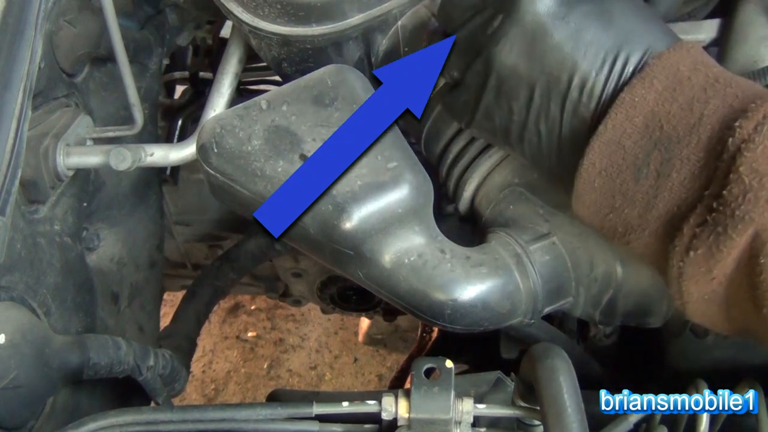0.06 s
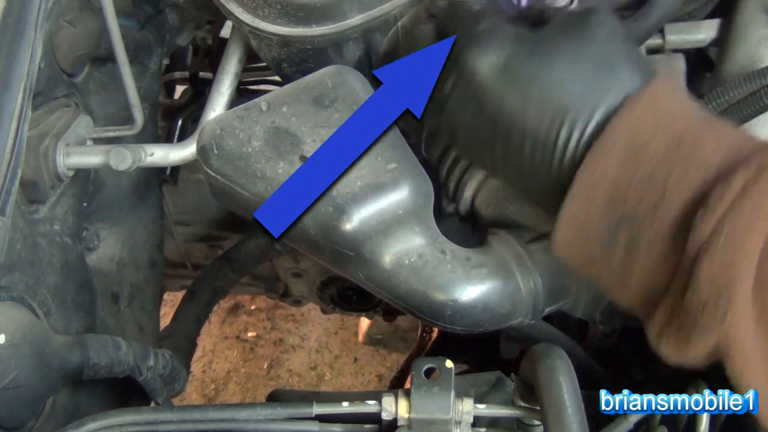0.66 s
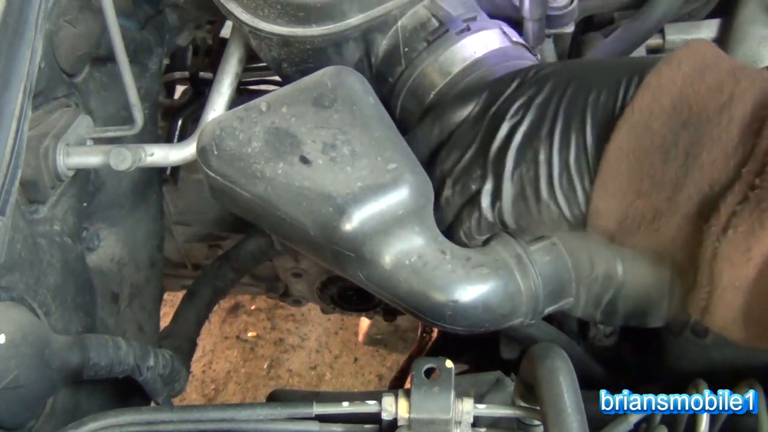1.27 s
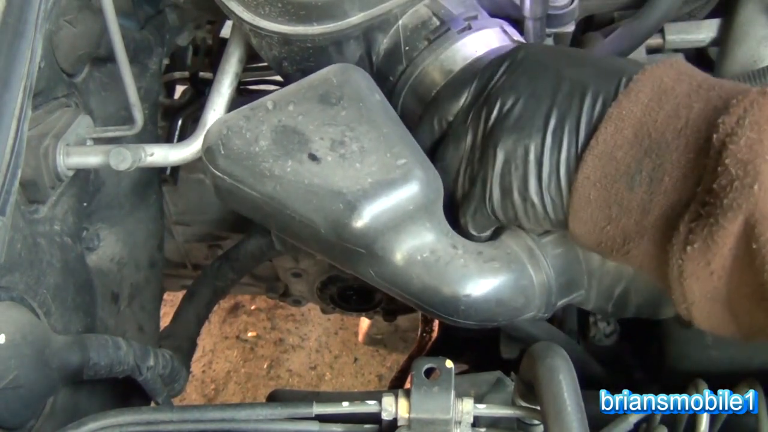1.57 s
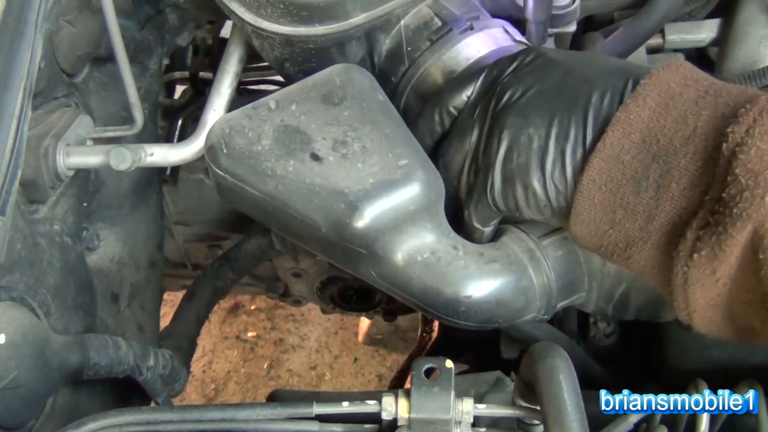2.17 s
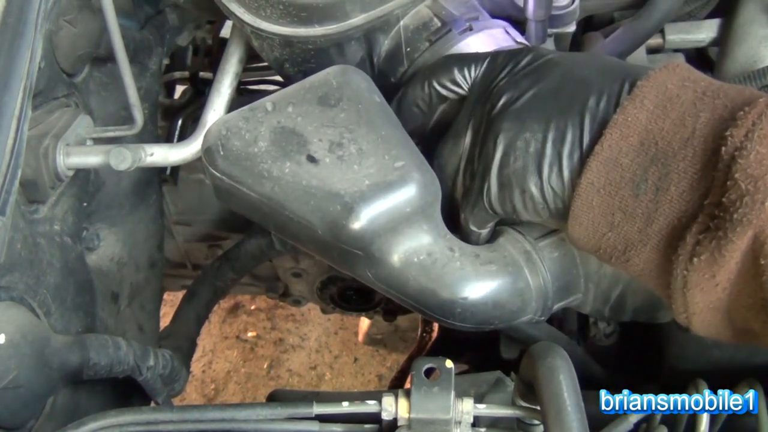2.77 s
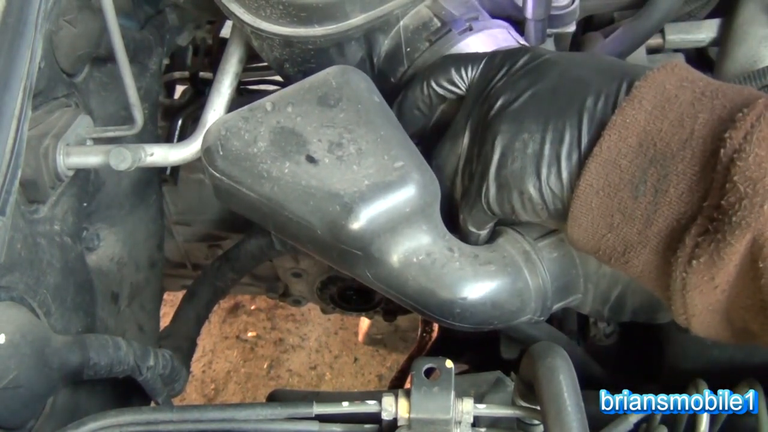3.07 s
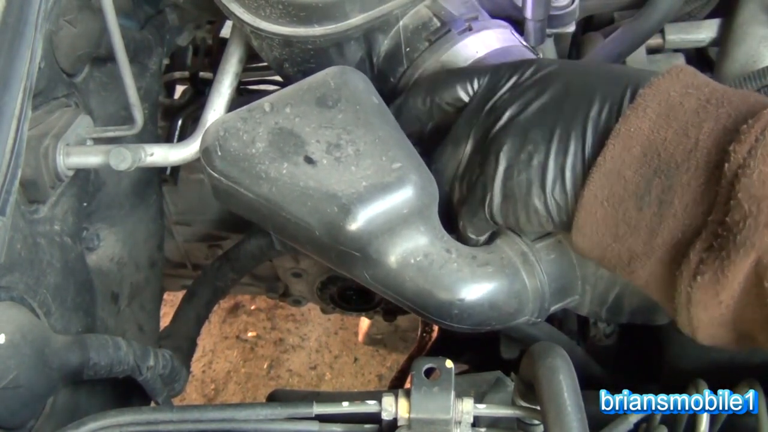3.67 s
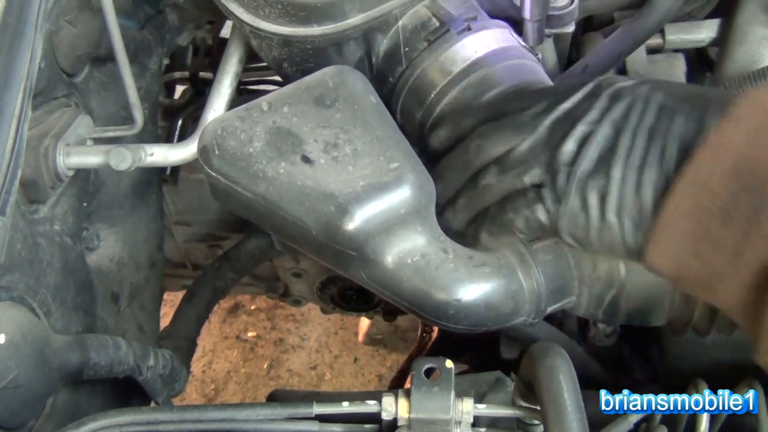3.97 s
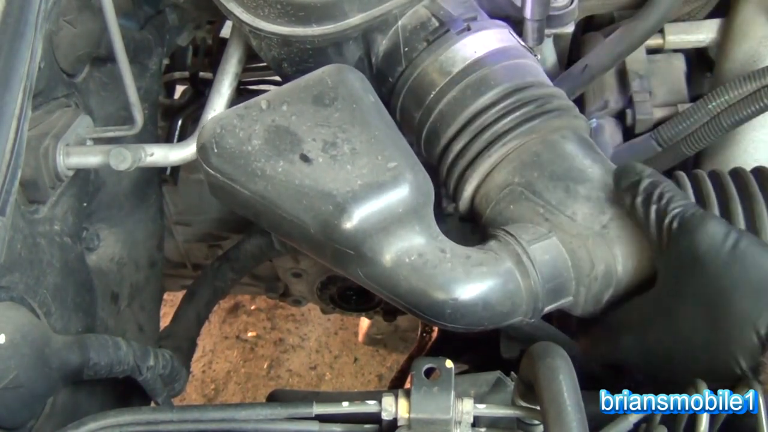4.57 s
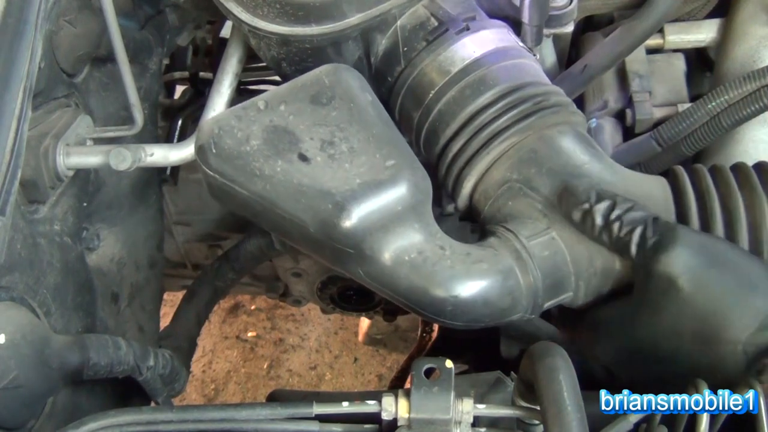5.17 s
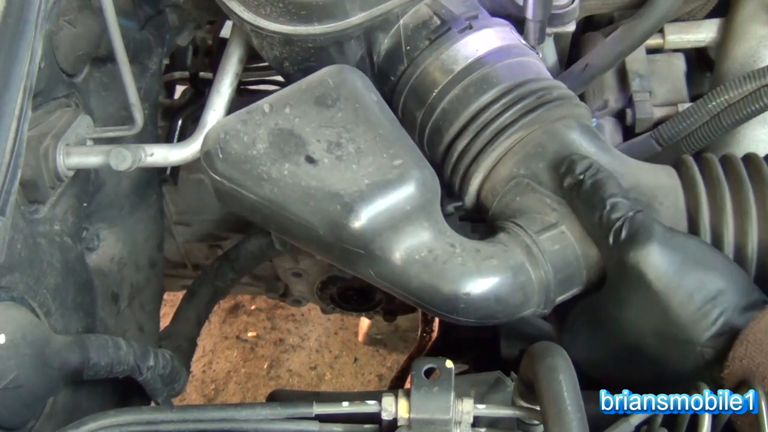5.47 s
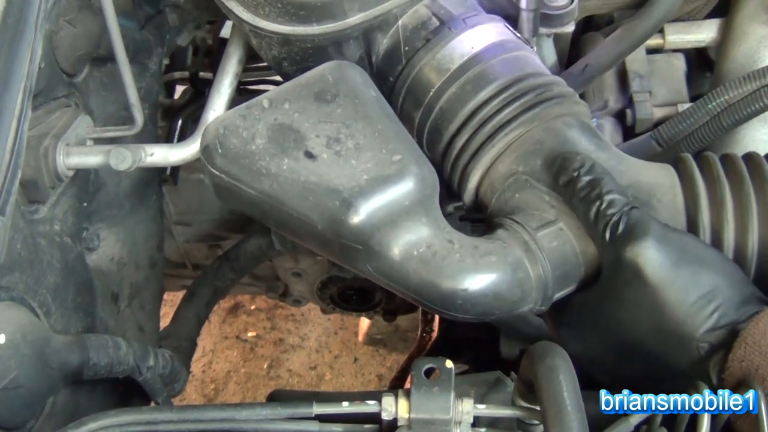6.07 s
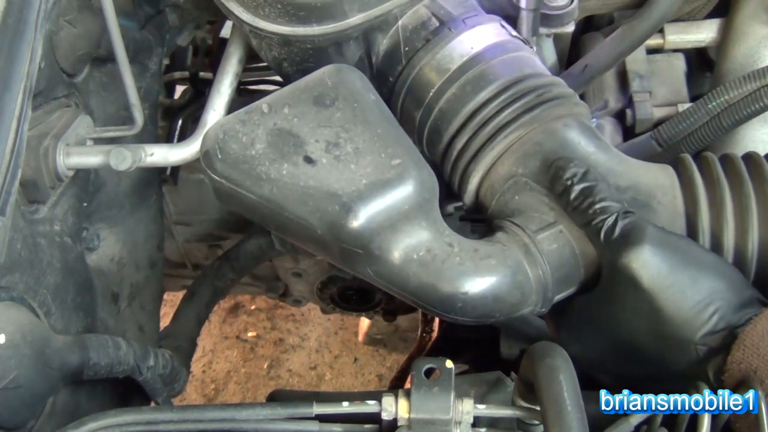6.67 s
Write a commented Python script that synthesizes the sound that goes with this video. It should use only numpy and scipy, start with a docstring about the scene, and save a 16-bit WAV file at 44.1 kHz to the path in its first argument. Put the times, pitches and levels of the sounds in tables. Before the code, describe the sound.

A cordless driver rasps in three short bursts on a hose clamp, while a gloved hand scuffs rubber and knocks a plastic duct.

```python
"""A cordless driver turns a hose clamp in three rasping bursts, close by in a workshop.
Its gears tick once a motor turn; its speed control whines at a fixed pitch.
Between bursts a gloved hand fits a plastic intake duct and its rubber boot on an engine:
the glove scuffs the rubber, the duct clicks and knocks hollowly as it is pushed into line."""
import sys
import numpy as np
from scipy import signal
from scipy.fft import rfft, irfft, next_fast_len
from scipy.io import wavfile
from scipy.ndimage import uniform_filter1d

SR = 44100
rng = np.random.default_rng(int(sys.argv[2]) if len(sys.argv) > 2 else 0)


def transcribe(u):
    """Save the signal u as a 16-bit wav file named by the first command-line argument.

    u: samples, shape (n,) or (channels, n), limited to [-1, 1]; the rate is SR.
    q: integer samples, one column per channel.
    """
    v = np.clip(np.atleast_2d(u).T, -1, 1)
    q = np.round(v * 32767).astype(np.int16)
    wavfile.write(sys.argv[1], SR, q)


N = 305613
T = np.arange(N) / SR
GEAR_RATIO = 52  # motor turns per screw turn
KNEE_HZ = 208  # motor speed above which the rasp levels off

# plastic click spectrum: (frequency [Hz], density [dB])
CLICK_SPECTRUM = [(150, -19.5), (400, -13.5), (900, -8), (1500, -6.5), (2400, 2), (4000, -1.5), (5500, -2),
                  (7600, 8), (9500, -6), (13000, -19), (16000, -34)]
# colour of the stereo width, shared by room tail and air: (frequency [Hz], level [dB])
WIDTH_SPECTRUM = [(450, 3.5), (1100, -11), (7500, 1), (10500, -4)]


def driver(waver=0.0055):
    """Cordless driver: motor speed sets gear rasp and hum; the switched supply whines."""
    hz, rasp_gain, whine_gain, ease = motor()
    turns = np.cumsum(hz * (1 + waver * walk(90))) / SR
    gears = (gear_rasp(turns, hz) + motor_hum(turns, hz, ease)) * rasp_gain
    return pan(gears + brief_tones(), -0.11) + pan(wind_down(turns), -5.5) + supply_whine() * whine_gain


def motor(coast_s=.47, unload_db=-13, unload_s=0.012, fade_db_per_s=65, full_accel_hz_per_s=2500):
    """Speed, rasp gain, whine gain, ease: the screw binds once a turn; let go, the motor coasts."""
    # motor speed, one curve per run: (time [s], speed [Hz])
    speeds = [
        [(.59, 22), (.665, 97.96), (.78, 165.3), (.85, 166.9), (.92, 151.2), (1.0, 101.9), (1.07, 141.1),
         (1.125, 104), (1.165, 61.92)],
        [(2.29, 26.7), (2.35, 73.06), (2.43, 70.7), (2.54, 111.4), (2.67, 79.81), (2.81, 138.1), (2.88, 301.7),
         (3.05, 328.1), (3.3, 313), (3.40, 255.4), (3.46, 155.3)],
        [(6.365, 35.1), (6.42, 112.9), (6.5, 307.3), (6.58, 460.8), (6.71, 540), (6.87, 593)],
    ]
    # trigger pulls: (on [s], off [s], rasp [dB], whine [dB], whine swell [s],
    # speed swing from binding [0-1], easiest turning [s])
    runs = [(.592, 1.16, -18, -33.5, 0.24, 0.02, .86), (2.294, 3.465, -17, -37, 0.0023, 0.03, 3.05),
            (6.366, 7.0, -18, -37, 0.07, 0, 6.77)]
    # screw bites: (time [s], half length [s], rasp boost [dB])
    bites = [(0.956, 0.059, 4), (1.104, 0.028, 6), (2.6, 0.051, 3), (3.454, .025, 1.5)]
    out = np.zeros((4, N))
    out[0] = speeds[0][0][1]
    for curve, (on_s, off_s, rasp_db, whine_db, swell_s, swing, easy_s) in zip(speeds, runs):
        free_s = np.clip(T - off_s, 0, None)
        hz = np.interp(T, *np.transpose(curve)) * np.exp(-free_s / coast_s)
        accel_hz_per_s = uniform_filter1d(np.gradient(hz) * SR, size=1500)
        current = np.clip(accel_hz_per_s / full_accel_hz_per_s, -1, 1)
        screw_turns = np.cumsum(hz) / SR / GEAR_RATIO
        ease = np.cos(2 * np.pi * (screw_turns - np.interp(easy_s, T, screw_turns)))
        hz = np.maximum(hz * (1 + swing * ease), 10)
        release_db = unload_db * np.minimum(free_s / unload_s, 1) - fade_db_per_s * free_s
        rasp = undb(rasp_db + release_db) / np.hypot(1, (KNEE_HZ / hz) ** 1.8)
        soft_start_db = -6.5 * np.clip(1 - (T - on_s) / swell_s, 0, 1)
        drive_db = 5 * current + 4 * (hz / 600) ** 2
        whine = undb(whine_db + soft_start_db + drive_db) * np.exp(-free_s / unload_s)
        out = np.where(T >= on_s, [hz, rasp, whine, ease], out)
    out[1] *= undb(sum(db * np.exp(-((T - s) / half_s) ** 2) for s, half_s, db in bites))
    return out


def gear_rasp(turns, hz, body_hz=650, body_db=-19, dip_share=0.59):
    """Tooth strikes heard through the housing, which only rumbles in the bass."""
    # gear spectrum: (frequency [Hz], density [dB])
    spectrum = [(70, -30), (200, -13.5), (650, -13.5), (1300, -6), (2500, -6.5), (3600, -2.5), (5200, -2),
                (6200, -2.5), (7300, 2), (8100, -0.5), (9000, -10.5), (10300, -15.5), (12500, -18),
                (16000, -33)]
    # bands the housing radiates weakly: (centre [Hz], width [Hz])
    dips = [(2830, 120), (4200, 290)]
    teeth = gear_teeth(turns, hz)
    # a reflection off the spinning chuck swirls the colour
    delay_s = .0006 + .0002 * np.sin(2 * np.pi * turns / GEAR_RATIO) + .00005 * walk(20)
    teeth = even(teeth + np.clip(hz / 1100, 0, .24) * np.interp(T - delay_s, T, teeth))
    rasp = highpass(teeth, body_hz) + undb(body_db) * band(noise(), 134, body_hz, order=3)
    for dip_hz, width_hz in dips:
        rasp -= dip_share * signal.lfilter(*signal.iirpeak(dip_hz, dip_hz / width_hz, SR), rasp)
    return colour(rasp, spectrum)


def gear_teeth(turns, hz, count=12, jitter_s=1.7e-5, clatter_db=2.5, grind_db=-2.5, grind_s=.0014):
    """Each turn: one crisp tick, a repeating clatter of teeth, a short grinding hiss."""
    total, clatter = int(turns[-1]) + 1, np.arange(count) > 0
    place = (np.arange(count) + rng.uniform(-0.515, 0.516, count) * clatter) / count
    at = np.interp(np.arange(total)[:, None] + place, turns, np.arange(N))
    at += jitter_s * SR * rng.standard_normal(at.shape)
    force = undb(rng.standard_normal(total))
    # clattering teeth drift in grip and weaken at low speed, where single ticks stand out
    grip = unit(uniform_filter1d(rng.standard_normal((total, count)), size=14, axis=0))
    grip *= np.clip(np.interp(np.arange(total), turns, hz) / 280, .4, 1)[:, None]
    size = force[:, None] * np.where(clatter, undb(clatter_db) * grip, 1)
    # the gear case smears each strike without colouring it
    lag_s = np.arange(256) / SR
    burst = rng.standard_normal(len(lag_s)) * np.exp(-lag_s / 0.00068)
    allpass = np.roll(irfft(np.exp(1j * np.angle(rfft(burst)))), 20)
    rattle = signal.fftconvolve(strikes(at.ravel(), size.ravel()), allpass)[:N]
    # the tick also radiates directly, most at speed
    snap = even(band(strikes(at[:, 0], force), 4800, 6100, order=1))
    snap *= undb(-7 + 4 * np.tanh(walk(25))) * np.sqrt(np.minimum(hz / KNEE_HZ, 1))
    grind_gate = force[turns.astype(int)] * np.exp(-(turns % 1) / hz / grind_s) + .15
    return even(even(rattle) + snap + undb(grind_db) * even(grind_gate * noise()))


def motor_hum(turns, hz, ease, hum_db=-22, swing_db=9):
    """Turn-rate harmonics sing in the housing resonance, swelling once a screw turn."""
    harmonics = sum(undb(3 * walk(20)) * np.sin(2 * np.pi * k * turns + .4 * walk(120))
                    for k in range(2, 15))
    gain = np.minimum(hz / KNEE_HZ, 1) ** 2 * undb(hum_db + swing_db * ease + 2 * walk(28))
    return even(band(harmonics, 1170, 2050)) * gain


def supply_whine(switch_hz=3925.5):
    """The speed control's switching sounds as fixed, slightly wavering tones."""
    # switching harmonics: (multiple [1], level [dB], left minus right [dB])
    harmonics = [(1, -7, -4.5), (2, 4.5, -3), (3, -12.5, -5)]
    out = np.zeros((2, N))
    for k, db, left_db in harmonics:
        gain = np.sqrt(2) * undb(db + 1.3 * walk(60))
        phase = 2 * np.pi * round(k) * switch_hz * T + 0.14 * k * walk(80)
        out += pan(gain * np.sin(phase), left_db)
    return out


def wind_down(turns, start_s=3.368, level_db=-30.5):
    """Rough, hollow gear note as the long run slows."""
    mesh_phase = 2 * np.pi * 5 * turns
    note = unit(np.sin(mesh_phase) * (1 + 0.78 * walk(250)) + np.cos(mesh_phase) * walk(900))
    return note * undb(level_db) * envelope(start_s, attack_s=0.048, hold_s=0.12, release_s=0.047)


def brief_tones():
    """Brief tones from the driver: resonant squeals and the slowing motor's low hum."""
    # driver tones: (start [s], length [s], pitch [Hz], level [dB])
    tones = [(2.504, 0.014, 405, -33.5), (3.409, 0.12, 118.3, -41), (6.704, 0.018, 957.5, -29.5),
             (6.726, 0.061, 364, -30)]
    out = np.zeros(N)
    for s, length_s, hz, db in tones:
        t = np.arange(int(length_s * SR)) / SR
        add(out, s, undb(db) * np.sqrt(2) * signal.windows.tukey(len(t)) * np.sin(2 * np.pi * hz * t))
    return out


def clicks(build_share=0.38, ring_db=-24, ring_s=0.053):
    """Plastic edges catch and snap free; nearby parts ring faintly."""
    # snaps: (time [s], level [dB], decay [s], tilt [dB/octave])
    snaps = [(0.235, -23, 0.0024, -4), (0.4184, -13, 0.0018, -0.5), (.610, -18.5, 0.0041, 1),
             (0.7455, -8.5, 0.00083, -3), (1.157, -22, 0.0016, -3.5), (1.394, -25, 0.0055, 2.5),
             (1.533, -20, 0.0034, 3.5), (1.606, -36, 0.0022, -7.5), (3.7949, -13.5, 0.0013, -1),
             (3.8347, -16.5, 0.0021, -1), (4.031, -24.5, 0.0018, 7.5), (4.8659, -20, 0.0048, 2.5),
             (4.9575, -20, 0.0053, 2), (5.4676, -17.5, 0.0017, 3), (5.636, -12, 0.0008, 6.5),
             (5.658, -18.5, 0.0074, 6), (6.3775, -22.5, 0.0018, 0)]
    out, t = np.zeros(N), np.arange(-SR // 20, SR // 6) / SR
    for s, db, decay_s, tilt_db in snaps:
        shape = np.exp(-np.abs(t) / np.where(t < 0, build_share * decay_s, decay_s))
        shape += undb(ring_db) * (t > 0) * np.exp(-np.abs(t) / ring_s)
        burst = shape * rng.standard_normal(len(t))
        add(out, s + t[0], undb(db) * colour(burst, CLICK_SPECTRUM, tilt_db))
    return pan(out, -0.67)


def knocks(modes_db=-4):
    """A push thuds the duct wall and rings its modes; place and softness pick the register."""
    # pushes: (time [s], level [dB], centre [Hz], spread [octaves], thud decay [s])
    pushes = [(0.234, -31, 292, 0.58, 0.017), (.42, -39, 377, 0.41, 0.013), (0.635, -24, 294, 1.5, 0.0093),
              (.752, -28, 286, 0.6, 0.0082), (1.157, -33.5, 330, 0.55, 0.0086),
              (1.408, -43.5, 160, 0.61, 0.024), (3.797, -31.5, 1400, 0.43, 0.02),
              (4.868, -35, 560, 1.4, 0.032), (4.961, -12.5, 746, 0.56, 0.013),
              (4.964, -32, 154, 0.36, 0.022), (5.467, -28, 490, 1.34, 0.011),
              (5.660, -26, 1320, 0.47, 0.053), (5.661, -21, 347, 0.56, 0.0036),
              (5.684, -29, 214, 0.62, 0.052)]
    # hollow duct modes: (frequency [Hz], level [dB], t60 [s])
    modes = [(150.5, -2.5, 0.23), (204.3, 6.5, 0.38), (282, 4, 0.13), (364.4, 10, 0.13), (405, 4.5, 0.26),
             (625, -6, 0.18), (809, 0, 0.16), (996, -19, 0.6), (1047, 6, 0.069), (1647, 9.5, 0.067)]
    out, t = np.zeros(N), np.arange(SR // 2) / SR
    hz, mode_db, t60_s = np.transpose(modes)[:, :, None]
    for s, db, centre_hz, spread_oct, decay_s in pushes:
        weight = undb(mode_db) * np.exp(-.5 * (np.log2(hz / centre_hz) / spread_oct) ** 2)
        weight *= rng.choice([-1, 1], hz.shape) / np.sqrt(np.sum(weight ** 2) / 2)
        ring = np.sum(weight * np.sin(2 * np.pi * hz * t) * np.exp(-np.log(1000) * t / t60_s), axis=0)
        burst = rng.standard_normal(len(t)) * np.exp(-t / decay_s)
        thud = band(burst, centre_hz / 2 ** spread_oct, centre_hz * 2 ** spread_oct)
        thud *= np.sqrt(decay_s * SR / 2 / np.sum(thud ** 2))
        add(out, s, undb(db) * (undb(modes_db) * ring + thud))
    return pan(out, -0.95)


def glove(grain_db=2, patchy_db=1.5, folds_per_s=12):
    """Tiny slips on rubber swell and fade with each stroke; folds let go with a crackle."""
    # glove and sleeve strokes: (peak [s], half length [s], level [dB], tilt [dB/octave])
    strokes = [(0.11, 0.72, -50.5, -5), (1.29, 0.34, -42, 1), (1.6, 0.88, -57, 11.5),
               (3.834, 0.16, -41.5, 1), (3.996, 0.075, -33.5, 6), (4.111, 0.031, -31.5, 7.5),
               (4.457, 0.058, -32, 4.5), (4.542, 0.067, -36.5, 4.5), (4.746, 0.029, -29, 4),
               (4.853, 0.53, -42.5, -1.5), (5.265, 0.11, -38.5, 2), (5.455, 0.14, -42, -2.5),
               (5.705, 0.066, -36.5, -1.5)]
    # friction spectrum: (frequency [Hz], density [dB])
    spectrum = [(80, -14.5), (300, -3), (700, -4), (1300, -1.5), (2500, -6), (5000, -9.5), (7600, 1.5),
                (9400, -12), (13000, -26.5), (16000, -30)]
    slips = unit(noise() * undb(grain_db * noise() + patchy_db * walk(150)))
    folds = (rng.random(N) < folds_per_s / SR) * rng.uniform(.7, 2.5, N)
    slips *= 1 + tails(folds, decay_s=.0015)
    out = np.zeros(N)
    for s, half_s, db, tilt_db in strokes:
        near = np.abs(T - s) < 3 * half_s
        stroke = slips[near] * np.exp(-((T[near] - s) / half_s) ** 2)
        add(out, T[near][0], undb(db) * colour(stroke, spectrum, tilt_db))
    return pan(out, -0.63)


def ticks(per_s=6, level_db=-42):
    """Faint stray ticks of rubber and plastic under the hand."""
    touches = (rng.random(N) < per_s / SR) * undb(0.5 * np.clip(noise(), -2, 2))
    bursts = tails(touches, decay_s=0.0027) * noise()
    return pan(undb(level_db) * colour(bursts, CLICK_SPECTRUM, tilt_db=-3), -.6)


def workshop(air_db=-50, air_side_db=-15, hiss_side_db=-2):
    """Room air, rumble of shifted parts, wavering low hum, thin electronic hiss."""
    # air spectrum: (frequency [Hz], density [dB])
    air = [(25, -32), (55, -6), (100, -3), (300, -3.5), (600, -10.5), (1000, -6), (2300, -18), (8000, -19),
           (10000, -25), (16000, -28.5)]
    # rumble of shifted parts: (start [s], hold [s], level [dB])
    shifts = [(0, 1.33, -55), (5.66, .11, -48)]
    # hum tones: (frequency [Hz], level [dB])
    hum_tones = [(54.5, -63.5), (98.5, -59), (120, -57)]
    # hiss bands: (centre [Hz], width [Hz], level [dB])
    hiss_bands = [(6090, 520, -54), (7900, 1800, -61), (8775, 640, -52.5)]
    sides = np.array([[1], [-1]])
    out = colour(noise(), air) * undb(air_db + 0.59 * walk(8.6))
    out = out + sides * colour(colour(noise(), air), WIDTH_SPECTRUM) * undb(air_db + air_side_db)
    rumble_gain = sum(undb(db) * envelope(s, .01, hold_s, .06) for s, hold_s, db in shifts)
    out += pan(band(noise(), 46, 68) * rumble_gain, -2.3)
    for hz, db in hum_tones:
        gain = np.sqrt(2) * undb(db + 2.4 * walk(5.5))
        out += pan(gain * np.sin(2 * np.pi * hz * T + 1.62 * walk(7.6)), -5)
    for hz, width_hz, db in hiss_bands:
        mid, side = (band(noise(), hz - width_hz / 2, hz + width_hz / 2, order=3) for _ in range(2))
        out += undb(db) * (mid + undb(hiss_side_db) * sides * side)
    return out


def room(x, wet_db, t60_s):
    """Short stereo tail from engine bay and walls."""
    t = np.arange(SR // 2) / SR
    echoes = rng.standard_normal((2, len(t))) * np.exp(-np.log(1000) * t / t60_s) * (t > .003)
    echoes /= np.sqrt(np.sum(echoes ** 2, axis=1, keepdims=True))
    echoes = np.array([colour(side, WIDTH_SPECTRUM) for side in echoes])
    return x + undb(wet_db) * signal.fftconvolve(x, echoes, axes=1)[:, :N]


def undb(db):
    """Decibels to gain."""
    return 10 ** (np.asarray(db) / 20)


def unit(x):
    """Scale to rms 1."""
    return x / np.sqrt(np.mean(x ** 2) + 1e-18)


def even(x):
    """Hold the running rms at 1."""
    return x / np.sqrt(np.abs(uniform_filter1d(x ** 2, size=2200)) + 1e-12)


def noise():
    """White noise."""
    return rng.standard_normal(N)


def walk(rate_hz):
    """Smooth random wander, rms 1."""
    step = int(SR / rate_hz)
    return unit(uniform_filter1d(np.repeat(rng.standard_normal(N // step + 1), step), step)[:N])


def envelope(start_s, attack_s, hold_s, release_s):
    """Linear attack, hold, exponential release."""
    t = T - start_s
    return np.clip(t / attack_s, 0, 1) * np.exp(-np.clip(t - attack_s - hold_s, 0, None) / release_s)


def strikes(at, size):
    """Impulses at fractional sample positions."""
    taps = at.astype(int)[:, None] + np.arange(-5, 7)
    out = np.zeros(N)
    np.add.at(out, np.clip(taps, 0, N - 1), size[:, None] * np.sinc(taps - at[:, None]))
    return out


def tails(impulses, decay_s):
    """Give each impulse an exponential decay."""
    return signal.lfilter([1], [1, -np.exp(-1 / (decay_s * SR))], impulses)


def colour(x, points, tilt_db=0):
    """Causal filter through (Hz, dB) points, tilted per octave; keeps white-noise power."""
    size = next_fast_len(len(x) + 4096, True) // 2 * 2
    octave = np.log2(np.fft.rfftfreq(size, 1 / SR) + 1)
    hz, db = np.transpose(points)
    shape_db = np.interp(octave, np.log2(hz), db) + tilt_db * np.clip(octave, np.log2(hz[0]), None)
    cepstrum = irfft(np.log(unit(undb(shape_db))))
    cepstrum[1:size // 2] *= 2  # fold to minimum phase
    cepstrum[size // 2 + 1:] = 0
    return irfft(rfft(x, size) * np.exp(rfft(cepstrum)))[:len(x)]


def band(x, lo_hz, hi_hz, order=2):
    """Band-pass; keeps white-noise power."""
    hi_hz = min(hi_hz, SR * .45)
    sos = signal.butter(order, [lo_hz, hi_hz], "band", fs=SR, output="sos")
    return signal.sosfilt(sos, x) * np.sqrt(SR / 2 / (hi_hz - lo_hz))


def highpass(x, hz):
    """Second-order high-pass."""
    return signal.sosfilt(signal.butter(2, hz, "high", fs=SR, output="sos"), x)


def add(out, s, x):
    """Mix x in at time s."""
    i = max(int(s * SR), 0)
    out[i:i + len(x)] += x[:max(N - i, 0)]


def pan(x, left_db):
    """Mono to stereo; left_db is left minus right."""
    return x * undb(np.array([[left_db], [-left_db]]) / 2)


def scene():
    """Driver, glove and duct in the workshop; the knocks sound deeper in the engine bay."""
    close = room(driver() + glove() + clicks() + ticks(), wet_db=-19, t60_s=0.05)
    return close + room(knocks(), wet_db=-18, t60_s=.12) + workshop()


def record(dry, low_hz=38, ceiling=.8, top_hz=16200):
    """Drop the deepest bass, round the peaks, cut the top."""
    rounded = ceiling * np.tanh(highpass(dry, low_hz) / ceiling)
    return signal.sosfilt(signal.ellip(10, .2, 80, top_hz, fs=SR, output="sos"), rounded)


dry = scene()
out = record(dry)
transcribe(out)
```